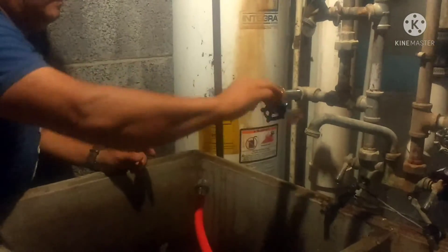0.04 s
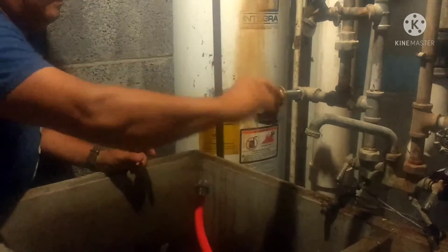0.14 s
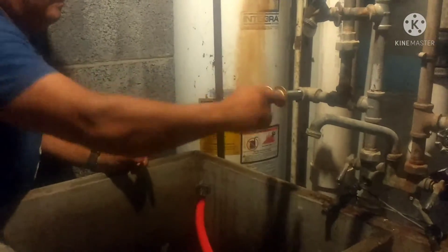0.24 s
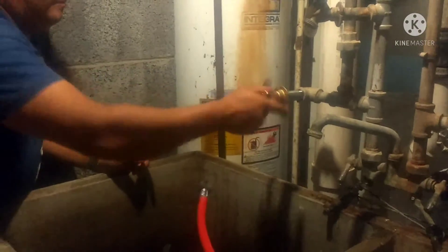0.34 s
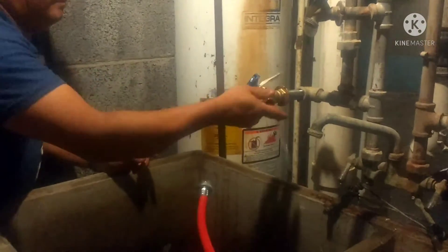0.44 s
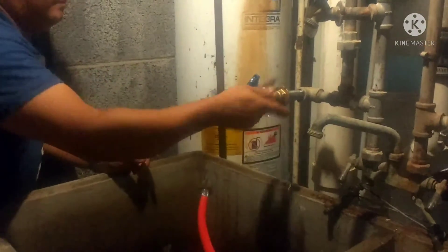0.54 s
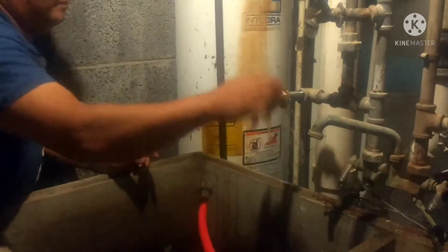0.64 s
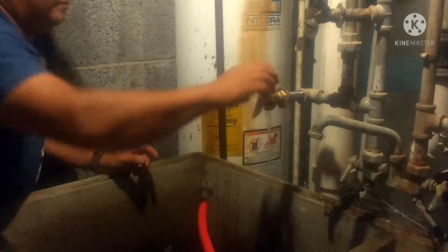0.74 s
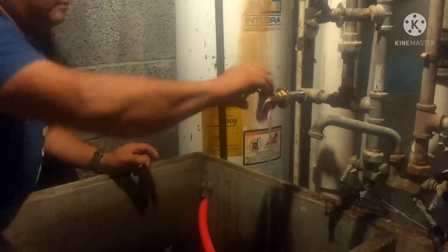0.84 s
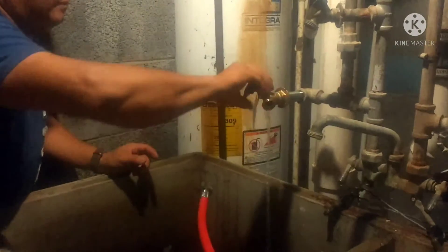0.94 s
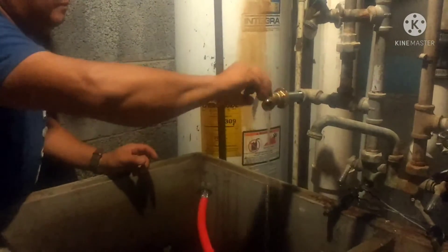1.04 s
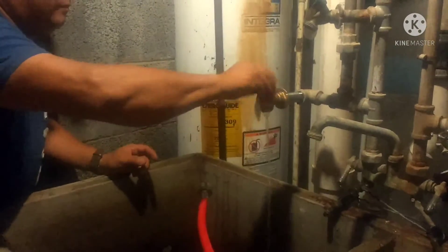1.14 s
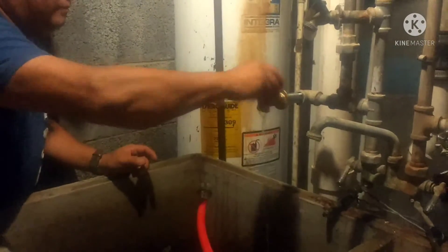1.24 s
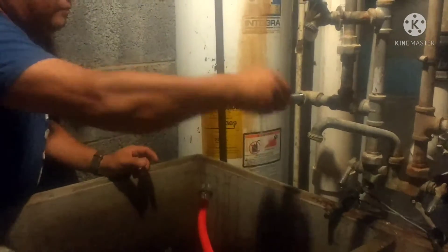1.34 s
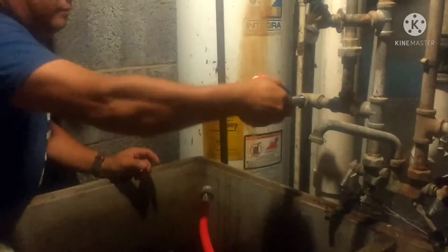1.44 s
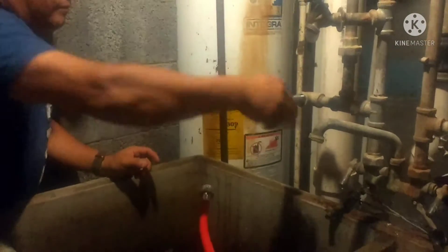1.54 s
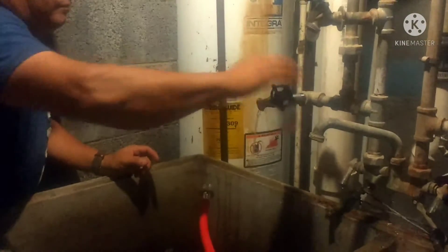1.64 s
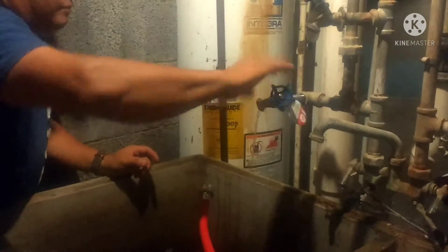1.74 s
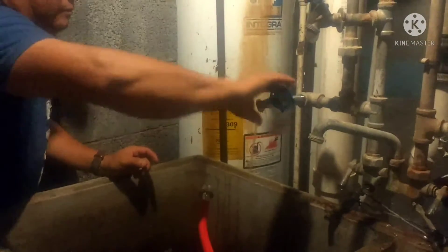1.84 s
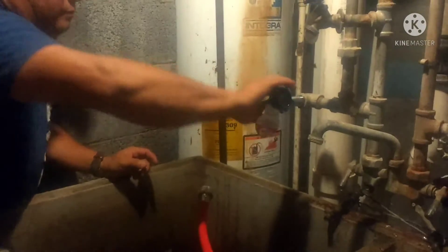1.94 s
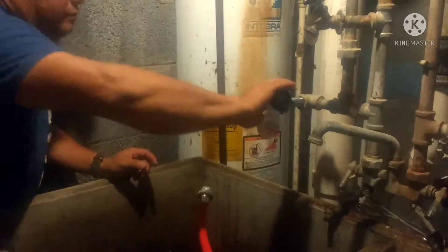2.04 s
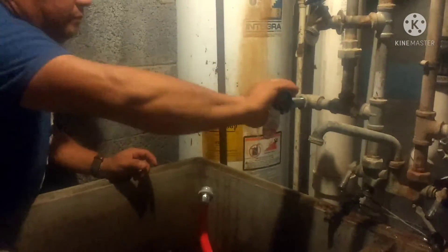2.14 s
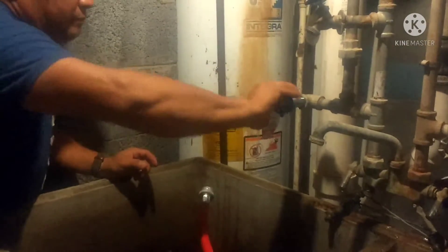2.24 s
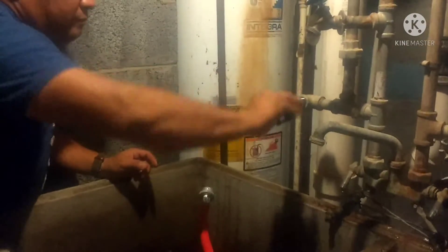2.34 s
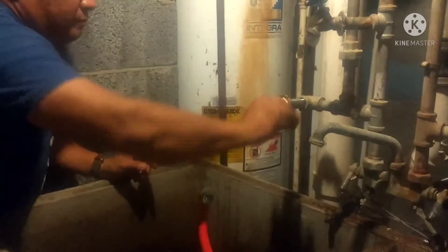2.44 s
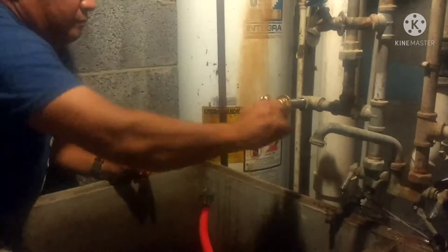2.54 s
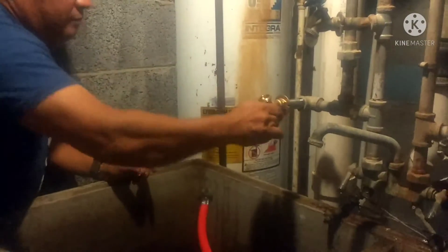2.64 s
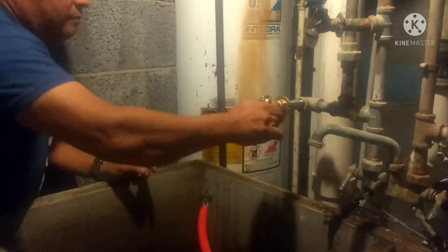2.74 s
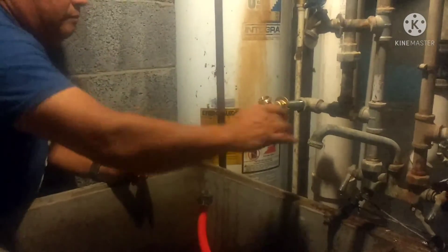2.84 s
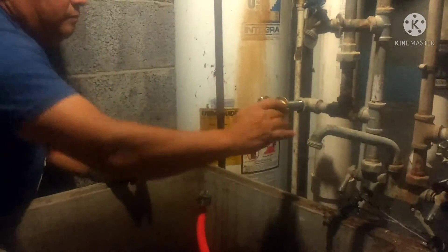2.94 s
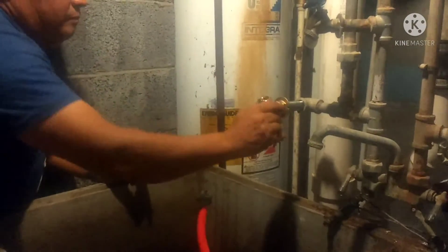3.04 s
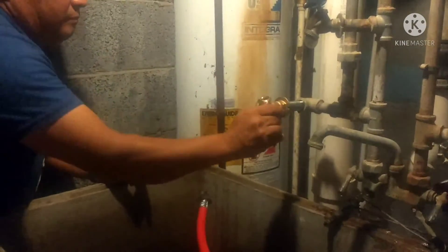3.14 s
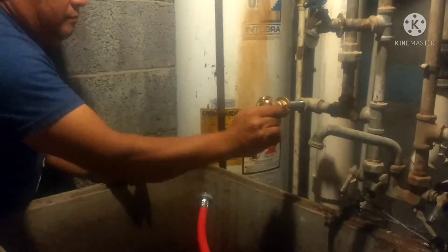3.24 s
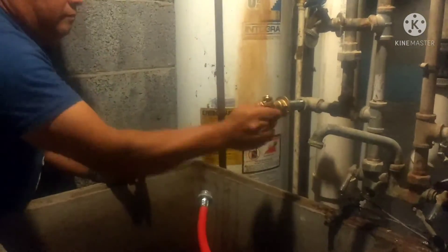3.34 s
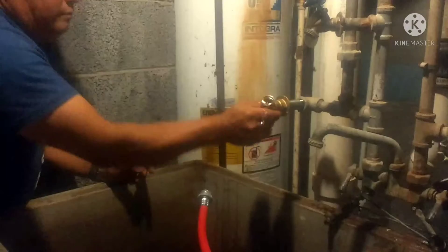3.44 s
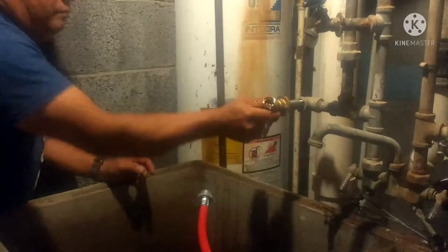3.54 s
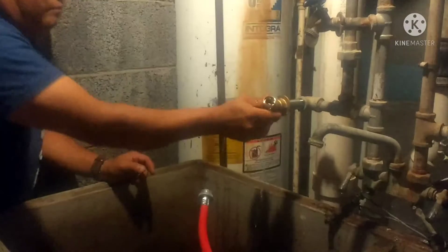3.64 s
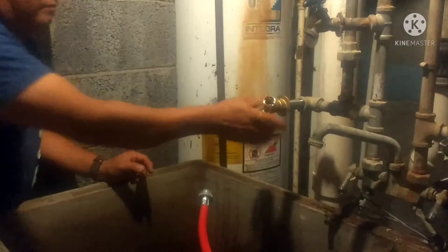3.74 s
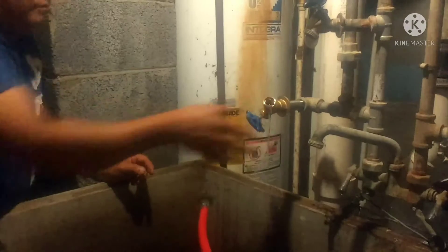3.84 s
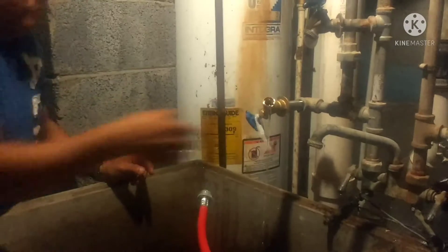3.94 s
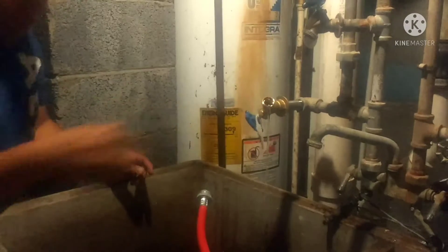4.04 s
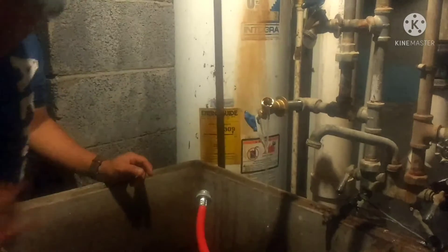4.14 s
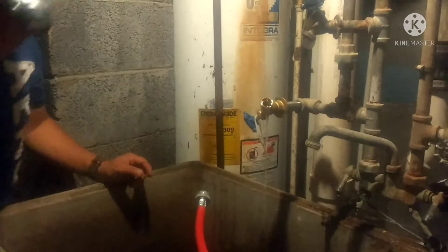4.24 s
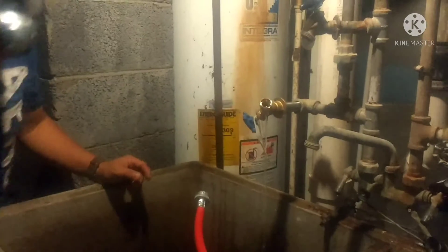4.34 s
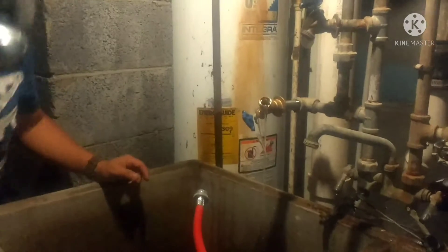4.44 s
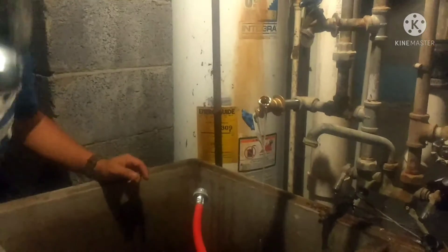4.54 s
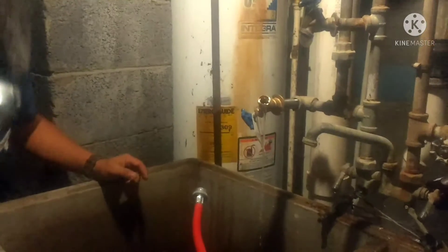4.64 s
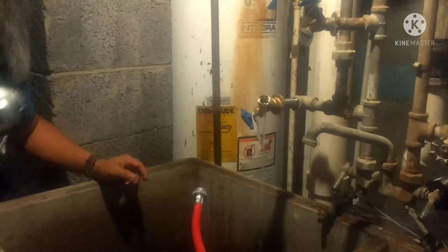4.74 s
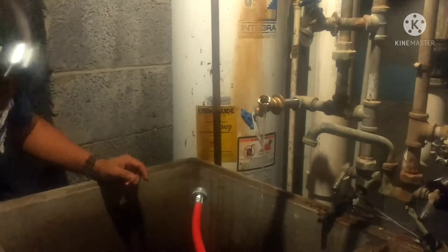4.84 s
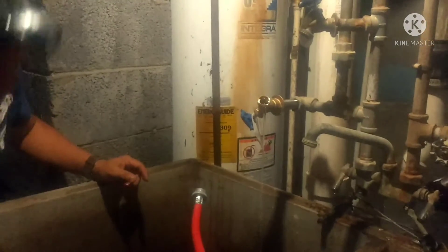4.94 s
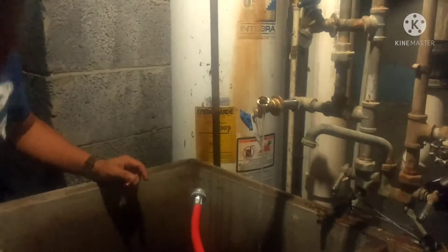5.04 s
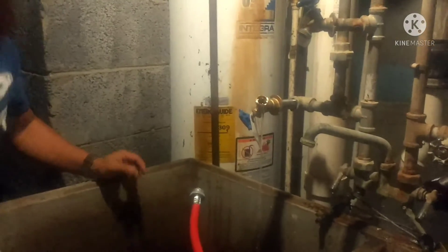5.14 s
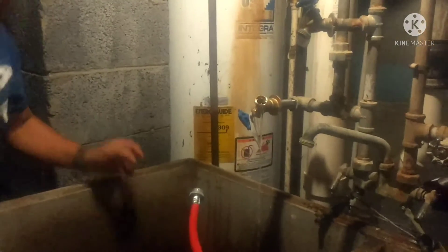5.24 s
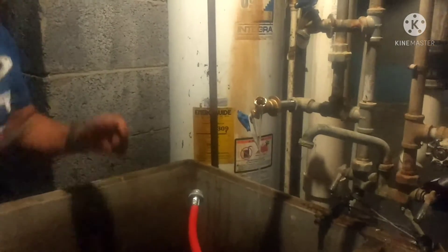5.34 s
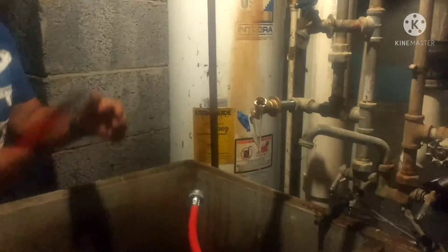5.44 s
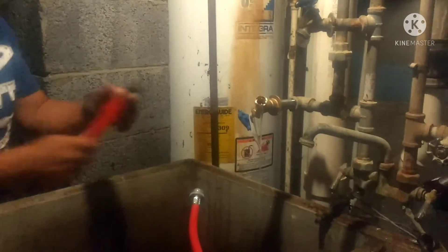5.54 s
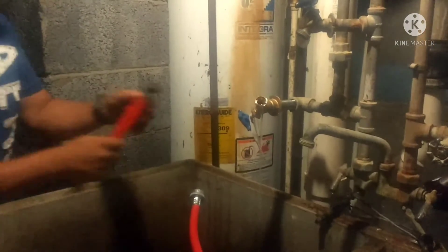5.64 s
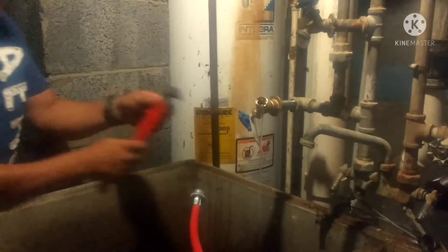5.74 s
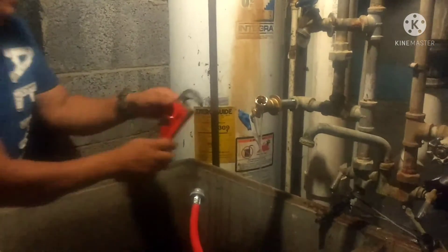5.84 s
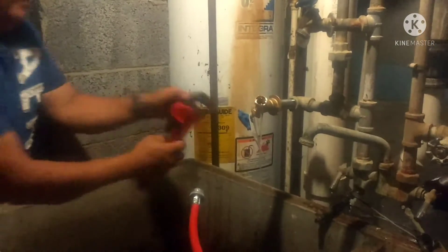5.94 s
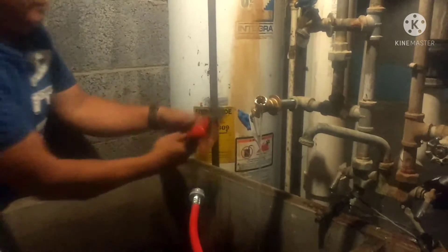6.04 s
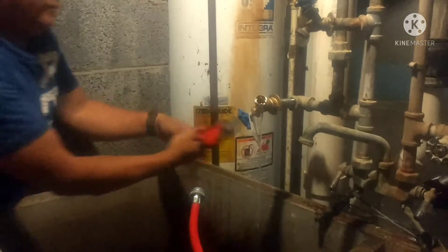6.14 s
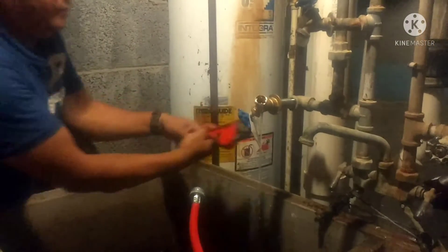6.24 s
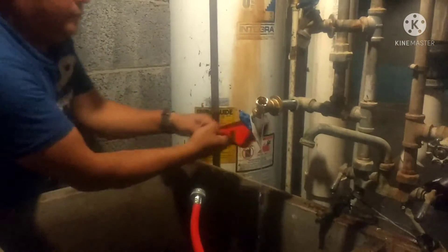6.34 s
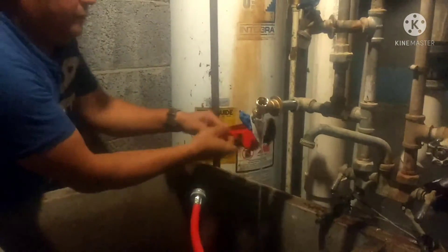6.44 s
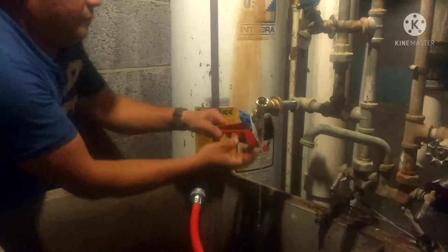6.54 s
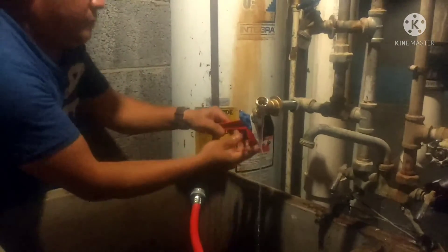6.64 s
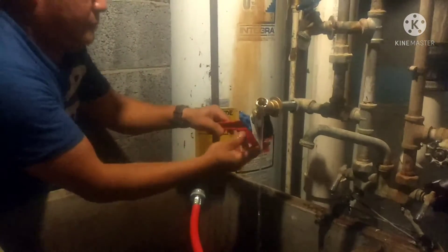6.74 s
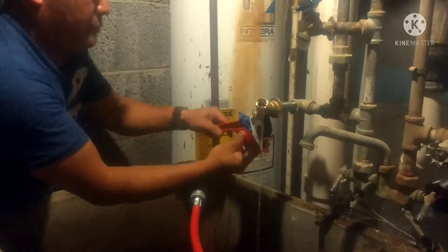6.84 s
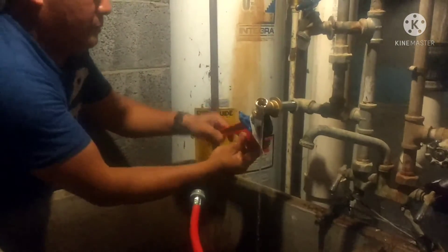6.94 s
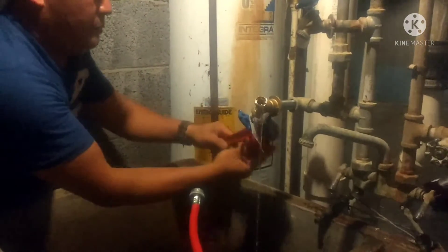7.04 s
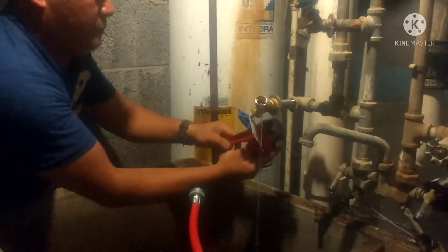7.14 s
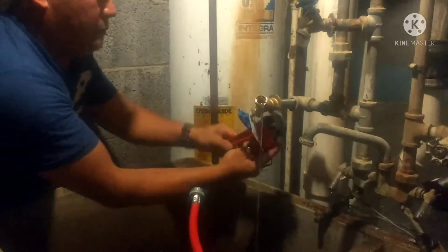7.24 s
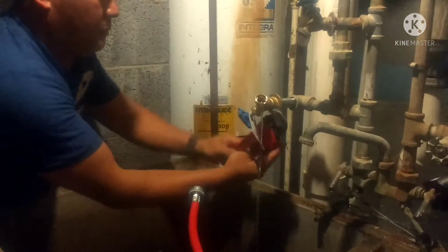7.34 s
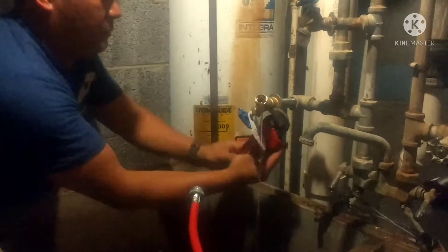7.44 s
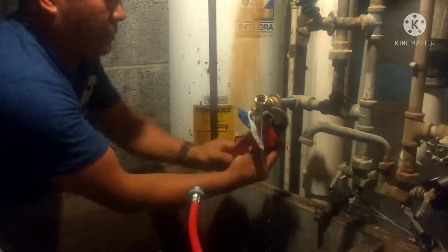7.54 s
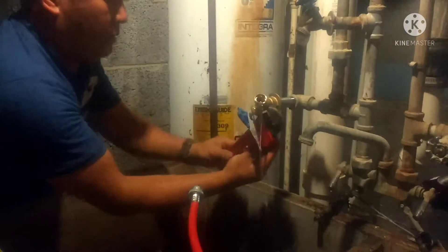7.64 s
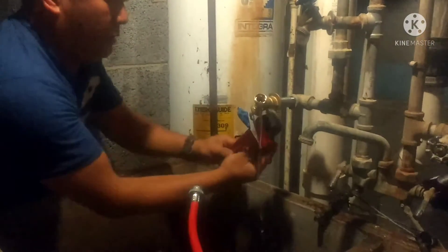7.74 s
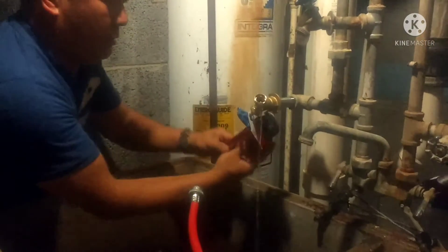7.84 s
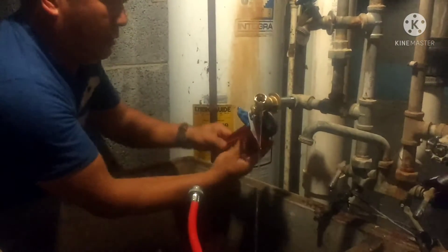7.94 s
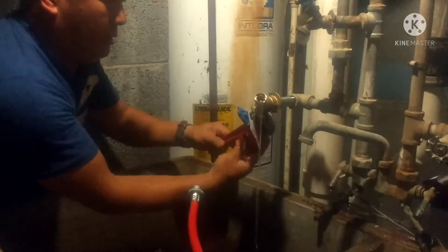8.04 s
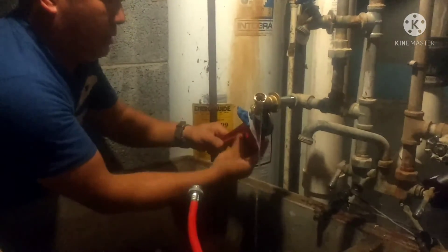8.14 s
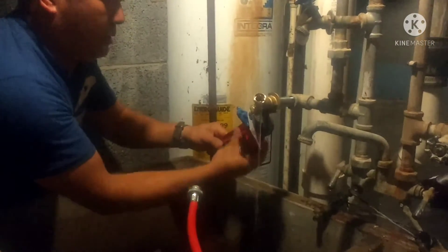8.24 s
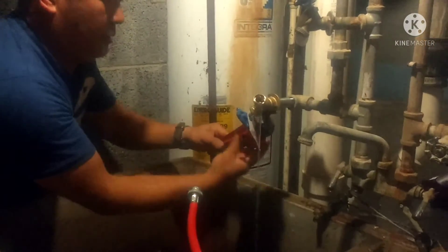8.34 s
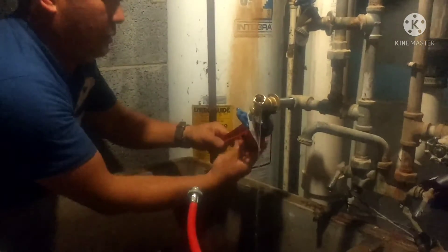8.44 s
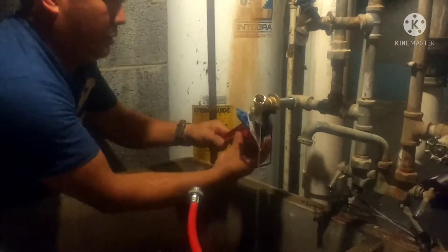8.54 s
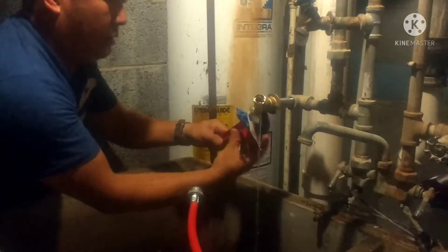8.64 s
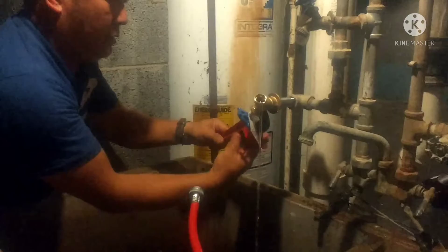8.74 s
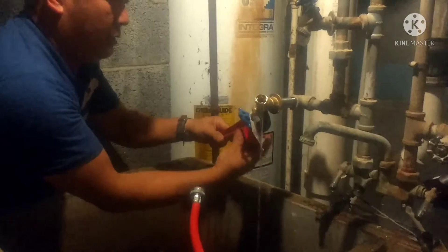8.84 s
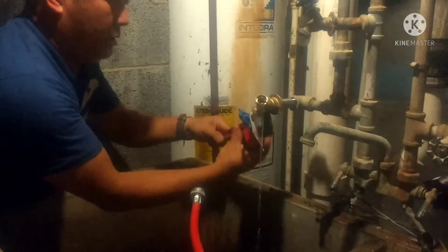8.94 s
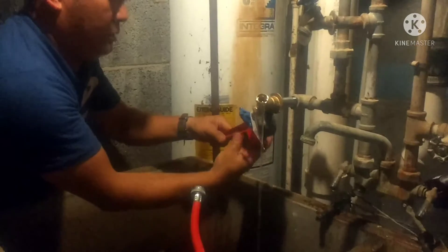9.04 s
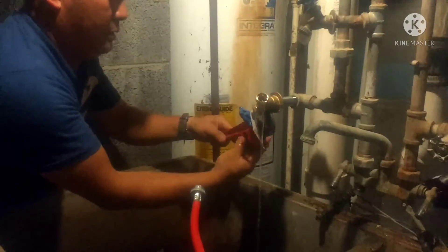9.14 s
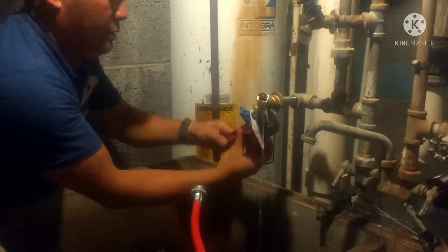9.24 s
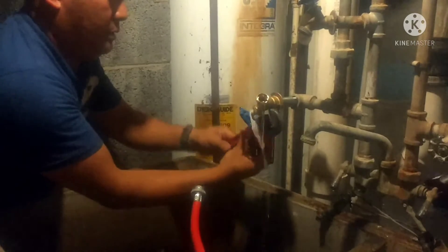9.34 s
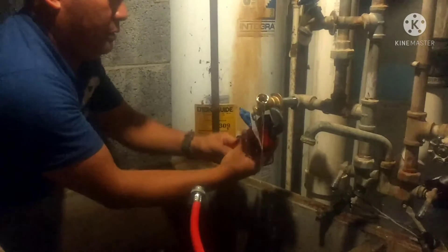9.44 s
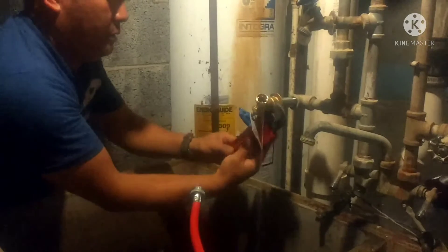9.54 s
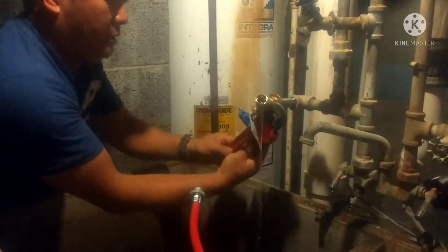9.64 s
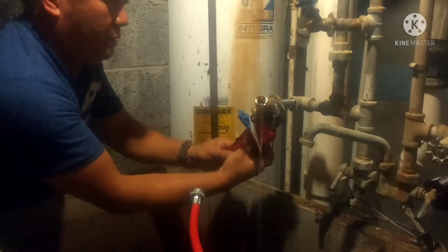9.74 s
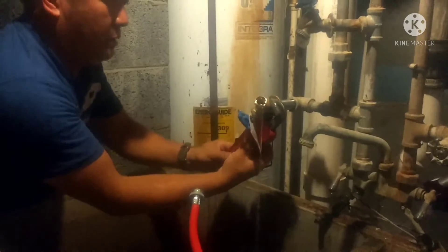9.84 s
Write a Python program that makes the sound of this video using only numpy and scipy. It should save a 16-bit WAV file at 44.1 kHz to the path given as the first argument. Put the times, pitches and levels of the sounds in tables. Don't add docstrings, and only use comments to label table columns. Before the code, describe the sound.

Close, slightly roomy stereo pickup of plumbing work over a soft low background hush. First, irregular dry ticks and breathy finger slips as a tap is screwed on by hand; one tick is much louder. Then tub thumps and a ringing steel clank as a wrench is lifted, several bright clinks, and lastly clustered low pipe knocks, jaw clicks and short metallic scrapes in a concrete room.

```python
import sys
import numpy as np
from scipy import signal
from scipy.fft import rfft, irfft
from scipy.io import wavfile

SR = 44100
rng = np.random.default_rng(int(sys.argv[2]) if len(sys.argv) > 2 else 0)


def invert_db(level):
    return 10 ** (np.asarray(level, dtype=float) / 20)


def waveform_to_disk(signal):
    frames = np.transpose(np.atleast_2d(signal))
    scaled = np.clip(frames, -1, 1) * 32767
    samples = np.round(scaled).astype(np.int16)
    wavfile.write(sys.argv[1], SR, samples)


N = 435708

# [pitch_hz, level_db per Hz]
AIR = [(35, -16), (95, -4.5), (150, 2.5), (400, -8.5), (900, -14.5), (1400, -19.5), (3500, -21),
       (7000, -27), (11000, -30.5), (15500, -30.5)]
# [start_s, rub of skin and steel level_db, push on the pipe level_db]
HANDS = [(0.0, -68.5, -71.5), (1.02, -56.5, -60), (2.06, -58.5, -53), (3.82, -66.5, -71),
         (4.07, -59.5, -55), (4.95, -68.5, -60.5), (5.06, -50.5, -52), (5.28, -54, -55),
         (5.94, -55.5, -56.5), (6.22, -51, -57), (6.6, -56, -54.5), (6.8, -56, -44.5), (7.7, -60.5, -43.5),
         (9.11, -58, -44.5), (9.3, -61, -50), (9.55, -63, -57), (9.62, -59, -44.5), (9.88, -51.5, -49.5)]
# [pitch_hz, level_db per Hz]
RUB = [(300, -9.5), (1000, -4), (3000, -3), (6000, -8), (10000, -14.5), (15500, -12.5)]
# [start_s, deep level_db]
SHOVES = [
    (0.469, -45.5),
    (3.901, -59),
    (7.5194, -30.5),
    (8.7293, -34.5),
    (9.6993, -37),
]
# [start_s, deep level_db, middle level_db, upper level_db, contact_ms]
KNOCKS = [(6.742, -28.5, -33, -32, 30.7), (6.895, -28, -36, -34, 31), (6.9483, -31, -62, -40.5, 29),
          (7.137, -42.5, -49.5, -43, 30), (7.285, -33, -31, -32.5, 28), (7.357, -38, -35.5, -38, 29),
          (7.638, -47, -34.5, -33, 43), (7.678, -33, -32.5, -37, 37), (7.7996, -47, -39, -45.5, 35),
          (7.8384, -41, -36, -36, 26), (8.1397, -39.5, -49.5, -50.5, 89), (8.2107, -39.5, -50, -46, 130),
          (8.326, -38.5, -45.5, -42.5, 28), (8.863, -39, -51.5, -46, 23), (8.9794, -45, -49.5, -42.5, 12),
          (9.099, -47, -57, -43.5, 22), (9.178, -45, -62, -54, 8.1), (9.2545, -47.5, -43, -42, 36),
          (9.615, -52, -48, -55, 46), (9.66, -43, -39, -45.5, 40), (9.8398, -41, -47, -44.5, 29)]
# [pitch_hz, level_db, t60_s]
PIPES = [(146, -7.5, 0.15), (165.6, -3.5, 0.092), (193.7, -6.5, 0.13), (260.6, -6.5, 0.058), (312, -16, .1),
         (428, -18.5, 0.13), (453, -16, 0.073), (519, -11.5, 0.13), (646, -12.5, 0.17),
         (696, -11, 0.092), (762, -5, 0.08), (776.5, -2, 0.12), (833, 1.5, 0.061), (900, -4, 0.064),
          (953.3, -0.5, 0.086), (1006, -1, 0.065), (1094, -6.5, 0.035), (1182, -9.5, 0.066),
          (1315, -9, 0.04),
         (1690, -14, 0.05), (1909, 3, .07), (2148, 0, 0.073), (2288, -3, 0.058), (2310, -3.5, 0.051),
           (2466, 0.5, 0.038), (2605, -0.5, 0.096), (2710, -5, .08), (2820, -20, 0.065)]
# [start_s, peak level_db, colour pitch_hz, sizzle level_db]
SLIPS = [(0.4777, -62, 2860, -60), (0.769, -42.5, 2650, -53), (0.8096, -33, 5070, -48),
         (0.8766, -38, 5900, -48), (1.5797, -40, 2720, -56.5), (1.7602, -48, 4680, -50),
         (2.2568, -43.5, 2700, -51), (2.4316, -45.5, 4600, -49), (2.9194, -47, 3970, -75),
         (2.9719, -39.5, 2450, -72), (3.0621, -47, 2680, -74), (3.9597, -41.5, 3020, -51.5),
         (4.0163, -42.5, 4770, -59), (4.1886, -37.5, 3930, -62), (4.289, -45, 2800, -75),
         (4.4357, -44, 2650, -51), (4.4706, -36, 2800, -66)]
# [start_s, peak level_db, colour pitch_hz,
# sizzle level_db]
TICKS = [(0.615, -48, 7640, -72), (0.9786, -31, 5850, -55), (1.0266, -39, 2490, -60),
         (1.088, -29.5, 6550, -48), (1.1105, -47, 6070, -46), (1.1415, -16.5, 3300, -49),
         (1.1502, -22, 3900, -44.5), (1.5274, -35, 2040, -51), (1.5494, -34, 6450, -47),
         (1.6757, -36.5, 5560, -52), (1.695, -32, 4500, -58), (1.789, -65, 2810, -50),
         (1.8838, -39, 5240, -59), (2.143, -59, 2620, -56), (2.229, -36.5, 1760, -64),
         (2.5022, -30.5, 5260, -50), (3.8, -44, 6230, -63), (6.03, -50, 9000, -50), (3.923, -35, 4500, -62),
         (4.571, -40.5, 4250, -58), (4.6694, -56, 2710, -53), (6.745, -27, 7260, -49),
         (5.013, -17.5, 4500, -41), (5.9804, -43, 6000, -49), (6.19, -31, 4500, -53),
         (5.6424, -45, 4200, -53.5), (7.81, -59, 9000, -47.5), (7.924, -55, 9000, -48),
         (7.775, -42.5, 7000, -61), (7.29, -50, 7000, -49), (7.69, -46, 7000, -54),
         (9.176, -39.5, 4500, -43), (8.513, -60, 9000, -58), (8.669, -52.5, 9000, -47),
         (8.768, -61, 9000, -49)]
# [start_s, length_s, peak level_db, colour pitch_hz, width_octaves]
SCRAPES = [(1.139, 0.011, -30, 1260, 1.4), (5.0105, 0.024, -13, 2795, 0.042),
           (6.172, 0.017, -34.5, 930, 0.19), (9.002, 0.0159, -34.5, 3030, 0.12),
           (9.1745, 0.008, -20, 2460, 2.6), (5.545, 0.054, -38, 2820, 0.09), (7.832, 0.069, -40, 10500, 1),
           (8.938, 0.022, -35.5, 3000, 0.1), (9.1, 0.02, -34.5, 2700, 0.15),
           (8.41, 0.055, -45.5, 2700, 0.15), (6.64, 0.1, -41.5, 4600, 1.5),
           (8.921, 0.099, -27.5, 4700, 0.98), (8.938, 0.052, -29, 3660, 0.2),
           (9.07, 0.04, -35, 3760, 0.057), (9.07, 0.06, -38.5, 8720, 0.07)]
# [start_s, deep level_db, middle level_db, upper level_db, contact_ms]
BUMPS = [(1.1407, -83, -63, -45, 3.6), (1.4703, -47, -74, -58, 20), (1.4924, -45, -51, -51, 26),
         (1.5257, -48, -50, -66, 9.3), (2.2387, -76, -58.5, -77, 12), (2.9734, -67, -53, -74, 36),
         (4.4698, -59, -49, -50, 160), (4.8955, -30.5, -27, -30.5, 29), (4.954, -26, -29.5, -42.5, 14),
         (4.963, -27, -27, -42, 20), (5.015, -42, -34.5, -35, 8.4), (6.0574, -72, -54.5, -47.5, 9.2),
         (6.1801, -72, -58, -42, 3.8)]
# [pitch_hz, level_db, t60_s]
TUB = [(336.5, -14, 0.35), (351, 2, 0.09), (399, -0.5, 0.16), (533, 0, 0.08), (466, -6, 0.27),
       (523, -7, 0.45), (570, -2, 0.069), (677, 2, 0.12), (720, -2, 0.092), (852, -5, 0.15),
       (983, 1, 0.059), (1102, 2.5, 0.073), (1204, -6, 0.16), (1400, -8, 0.048), (1800, -26, 0.12),
       (2450, 8.5, 0.012), (2800, 7, 0.019), (3220, -1, 0.061)]
# [start_s, crack level_db, colour pitch_hz, handle level_db, jaw level_db]
CLINKS = [(5.0131, -24, 5430, -27, -23), (5.198, -31, 4060, -41.5, -66.5),
          (5.3242, -19, 6900, -35.5, -33.5), (5.488, -24.5, 5370, -54, -65), (5.5524, -36, 4070, -55, -61),
          (5.9804, -26, 6300, -58, -62), (6.057, -38, 7660, -30, -46), (6.178, -47, 7640, -27, -32),
          (6.2671, -20, 3950, -62, -35), (6.6702, -35, 7500, -60, -50), (6.6886, -31, 8100, -64, -36),
          (6.718, -29, 8100, -50.5, -34), (7.136, -38, 2600, -58, -60), (9.176, -18.5, 7450, -48.5, -28),
          (5.3147, -28, 4160, -50, -55), (5.3326, -26, 7750, -36, -35), (6.186, -50, 7700, -23, -29),
          (6.277, -23, 4200, -63, -46), (6.286, -27, 4200, -60, -48)]
# [start_s, crack level_db, colour pitch_hz, ring level_db]
BITES = [(7.798, -33.5, 4110, -57), (7.8712, -29, 4500, -60), (8.041, -27.5, 4660, -66.5),
         (8.1375, -29, 7300, -38.5), (8.2123, -23.5, 4800, -39), (8.2703, -33, 4440, -44),
         (8.3295, -35, 7550, -38.5), (8.4156, -57, 3980, -47.5), (8.611, -31, 4040, -46),
         (8.8568, -44, 7770, -58), (8.9234, -32, 7600, -36), (8.9437, -40, 7750, -33.5),
         (8.9676, -35, 5470, -32), (9.003, -33, 4030, -56), (9.079, -34, 3770, -36.5),
         (9.134, -30, 7560, -40), (9.6133, -35.5, 4660, -57), (9.6626, -34, 7550, -40),
         (9.7707, -21, 3920, -57), (9.841, -45, 4420, -59)]
# [pitch_hz, level_db, t60_s]
HANDLE = [(2615, 0, .28), (2790, 3, .095), (2806, -16, .5), (3066, -15, .2), (945, -20, .08),
          (2930, -16, .1)]
# [pitch_hz, level_db, t60_s]
JAW = [(3722, -2, .12), (3860, -8, .1), (4350, -14, .05), (5130, -8, .08), (5250, -12, .1), (5820, -10, .1),
       (6270, -12, .08), (7330, -8, .06), (7700, -3, .07), (7720, -13, .24), (7800, -8, .08),
       (8600, -9, .05), (8760, -14, .08)]
# [pitch_hz, t60_s]
ROOM = [(100, 0.98), (1000, 0.27), (4000, 0.45), (9000, 0.36), (16000, 0.08)]
# [pitch_hz, level_db]
APART = [(100, 1), (400, -2), (1500, 1), (3000, -7), (8000, -9), (15000, -11)]


def rms_one(x):
    return x / np.sqrt(np.mean(x ** 2) + 1e-20)


def at_hz(points, hz):
    table = np.array(points)
    return np.interp(np.log(hz + 1), np.log(table[:, 0]), table[:, 1])


def filtered(x, spectrum):
    gain = invert_db(at_hz(spectrum, np.fft.rfftfreq(N, 1 / SR)))
    return irfft(rfft(x) * gain, N)


def bandpass(x, edges_hz):
    return signal.sosfilt(signal.butter(2, edges_hz, "band", fs=SR, output="sos"), x)


def highpass(x, order, hz):
    return signal.sosfilt(signal.butter(order, hz, "high", fs=SR, output="sos"), x)


def drift(rate):
    count = int(N / SR * rate) + 2
    return np.interp(np.linspace(0, count - 1, N), np.arange(count), rng.standard_normal(count))


def contact(ms, rise, lumpy_db):
    t = np.arange(6000) / SR
    lumps = np.repeat(rng.standard_normal(150), 40)
    tau = max(ms, 1) / 1000
    swell = 1 - np.exp(-t / (rise * tau))
    decay = np.exp(-(t / tau) ** 1.24)
    return swell * decay * invert_db(lumpy_db * lumps)


def add(track, s, burst):
    i = round(s * SR)
    track[i:i + len(burst)] += burst[:N - i]


def crack(force, hz, octaves):
    edges = np.clip(hz * 2 ** (np.array([-.5, .5]) * max(octaves, .03)), 200, .45 * SR)
    band = bandpass(force * rng.standard_normal(len(force)), edges)
    return band / np.max(np.abs(band))


def ring(force, hz, t60):
    r, w = invert_db(-60 / (t60 * SR)), 2 * np.pi * hz / SR
    return signal.lfilter([0, np.sin(w)], [1, -2 * r * np.cos(w), r * r], force + 1e-18)


def body(blows, modes, steady, ring_db, thud_db, crack_db, lowest_hz):
    forces, out = np.array([steady, steady, 0.35 * steady]), np.zeros(N)
    for s, *levels_db, ms in blows:
        touch = contact(ms, rise=0.039, lumpy_db=2.8)
        add(out, s, invert_db(levels_db[-1] + crack_db) * crack(touch, hz=4500, octaves=1.06))
        force = touch * rng.standard_normal(len(touch))
        force /= np.sqrt(np.sum(force ** 2))
        for track, db in zip(forces, levels_db):
            add(track, s, invert_db(db) * force)
    for hz, db, t60 in modes:
        group = (hz > 400) + (hz > 1400)
        out += invert_db(db + ring_db) * ring(forces[group], hz, t60)
    for track, edges in zip(forces, [(lowest_hz, 600), (480, 1620), (1250, 2550)]):
        out += invert_db(thud_db) * bandpass(track, edges)
    return out


def still_air():
    noise = filtered(rng.standard_normal((3, N)), AIR)
    return invert_db(-58.5 + 0.38 * drift(6.7)) * rms_one(noise)


def hands():
    start_s, *levels_db = np.transpose(HANDS)
    rub_db, push_db = [np.interp(np.arange(N) / SR, start_s, level) for level in levels_db]
    grains = rng.standard_normal(N) * invert_db(3.0 * drift(60) + 3.0 * drift(12))
    rub = invert_db(rub_db - 1.5) * rms_one(filtered(grains, RUB))
    push = invert_db(push_db - 40 + 4 * drift(25)) * rng.standard_normal(N)
    return rub, push


def pipework(push):
    water = invert_db(-79 - 32 + 6 * drift(2.0)) * rng.standard_normal(N)
    dull_db, shove_ms = -30, 22
    shoves = [(s, db, db + dull_db, db + dull_db, shove_ms) for s, db in SHOVES]
    out = body(KNOCKS + shoves, PIPES, push + water,
               ring_db=-1, thud_db=35.5, crack_db=-2.5, lowest_hz=118.6)
    return out + invert_db(1.5) * ring(water, hz=778, t60=0.32)


def threads():
    out = np.zeros(N)
    for rows, octaves, ms in [(TICKS, 0.83, 9.9), (SLIPS, 1.77, 23)]:
        for s, db, hz, sizzle_db in rows:
            force = contact(ms, rise=0.03, lumpy_db=1.0)
            add(out, s, invert_db(db) * crack(force, hz, octaves))
            add(out, s, invert_db(sizzle_db + 8.0) * crack(force, hz=12670, octaves=0.85))
    return out


def scrapes():
    out = np.zeros(N)
    for s, length_s, db, hz, octaves in SCRAPES:
        u = np.linspace(0, 1, 4000)
        force = np.interp(np.arange(8000) / SR / length_s, u, np.sin(np.pi * u ** 1.29) ** 2)
        add(out, s, invert_db(db) * crack(force, hz, octaves))
    return out


def tub():
    return body(BUMPS, TUB, np.zeros(N), ring_db=-5.0, thud_db=39.0, crack_db=-5.5, lowest_hz=310)


def wrench_modes(s, colour_hz, handle_db, jaw_db, seated):
    gripped = s < 6.1
    modes = []
    for k, (hz, db, t60) in enumerate(HANDLE):
        if gripped and k == 0:
            db -= 16
        if gripped and k == 1:
            t60 *= 0.3
        modes.append((hz, handle_db + db, t60))
    for hz, db, t60 in JAW:
        off_colour_db = -24 * np.log2(hz / colour_hz) ** 2
        modes.append((hz, jaw_db + db + off_colour_db, t60 * (0.62 if seated else 1)))
    return modes


def wrench():
    out, t = np.zeros(N), np.arange(13000) / SR
    clinks = [(*row, False) for row in CLINKS]
    bites = [(s, db, hz, ring_db - 14.5, ring_db, True) for s, db, hz, ring_db in BITES]
    for s, crack_db, colour_hz, handle_db, jaw_db, seated in clinks + bites:
        ms = np.interp(max(handle_db, jaw_db), [-50, -22], [12, 5])
        force = contact(ms, rise=0.099, lumpy_db=3.0)
        add(out, s, invert_db(crack_db - 6.5) * crack(force, colour_hz, octaves=1.17))
        add(out, s, invert_db(crack_db - 24.5) * crack(force, hz=11300, octaves=0.91))
        push = np.pad(force / force.sum(), (0, len(t) - len(force)))
        for hz, db, t60 in wrench_modes(s, colour_hz, handle_db, jaw_db, seated):
            if db <= -72:
                continue
            swell = signal.lfilter([1], [1, -invert_db(-60 / (t60 * SR))], push)
            rattle = invert_db(2.8 * np.interp(t, np.linspace(0, t[-1], 60), rng.standard_normal(60)))
            detune, phase = rng.standard_normal(2)
            turns = hz * (1 + 0.0014 * detune) * t + phase
            add(out, s, invert_db(db) * swell * rattle * np.sin(2 * np.pi * turns))
    return out


def basement(x):
    hz, t, cells = signal.stft(rng.standard_normal((3, SR // 2)), SR, nperseg=256)
    decay = invert_db(-60 * t / at_hz(ROOM, hz)[:, None])
    tail = signal.istft(cells * decay, SR, nperseg=256)[1]
    tail = np.pad(tail, ((0, 0), (int(.004 * SR), 0)))
    return signal.oaconvolve(x[None], tail / np.sqrt(np.sum(tail[0] ** 2)), axes=1)[:, :N]


def ports(x, in_step_hz):
    hz, lag_s = np.fft.rfftfreq(N, 1 / SR), 24.6 / 44100
    turn = np.array([2 * np.pi * hz * lag_s, np.pi * np.minimum(hz / in_step_hz, 1)])
    return irfft(rfft(x) * np.exp(-1j * turn), N)


def scene():
    air = still_air()
    rub, push = hands()
    knocks = highpass(pipework(push) + tub(), 6, 122)
    dry = rub + knocks + threads() + scrapes() + wrench()
    room = invert_db(-8.0) * basement(dry)
    apart = filtered(room[1:] + air[1:], APART)
    return ports(dry + room[0], in_step_hz=1054) + ports(air[0], in_step_hz=1) + apart


def roll_off(x):
    return signal.sosfilt(signal.butter(12, 16800, fs=SR, output="sos"), x)


def record(dry):
    thin = highpass(dry, 1, 70)
    cut = signal.sosfilt(signal.cheby2(10, 30, 15800, fs=SR, output="sos"), thin)
    return roll_off(cut)


dry = scene()
out = record(dry)
waveform_to_disk(out)
```